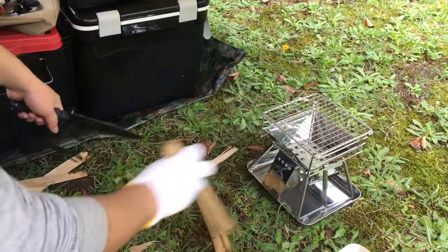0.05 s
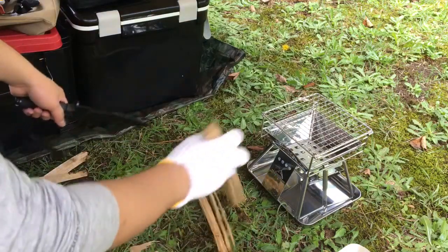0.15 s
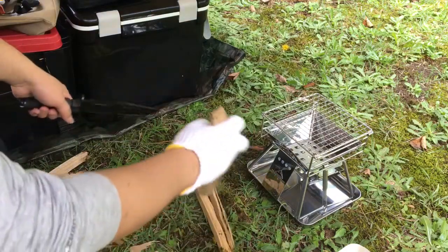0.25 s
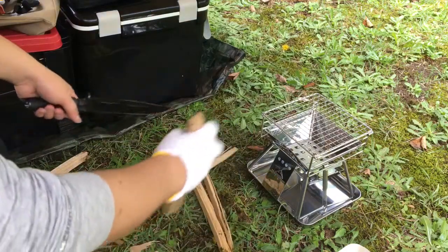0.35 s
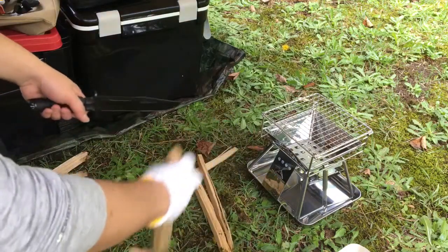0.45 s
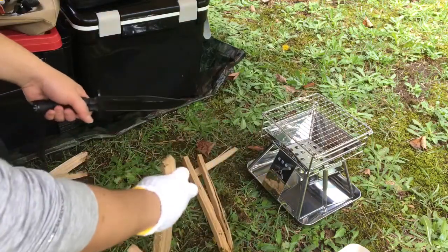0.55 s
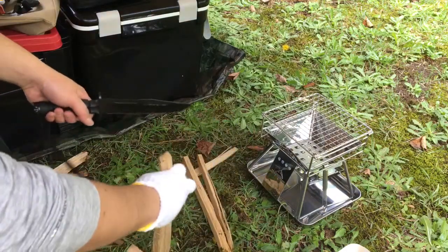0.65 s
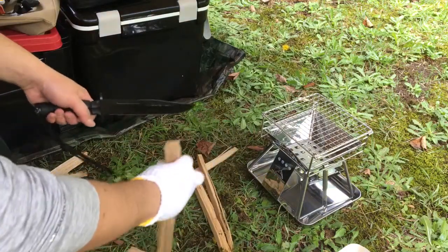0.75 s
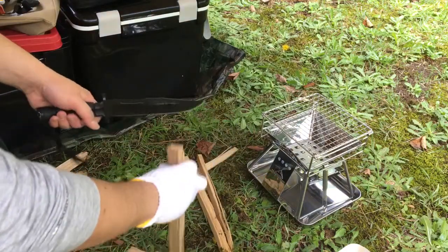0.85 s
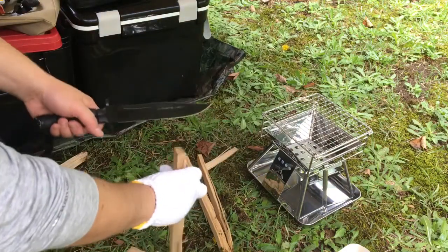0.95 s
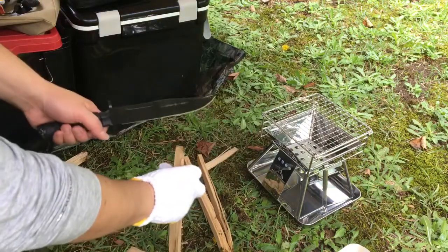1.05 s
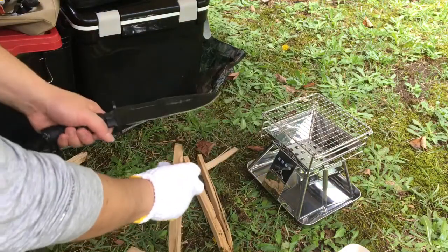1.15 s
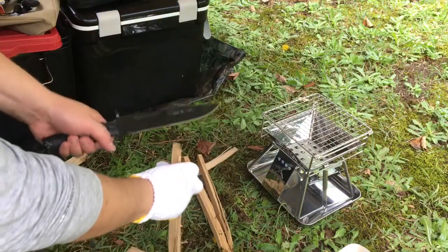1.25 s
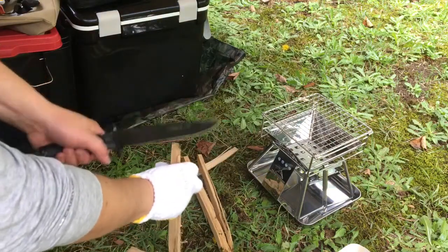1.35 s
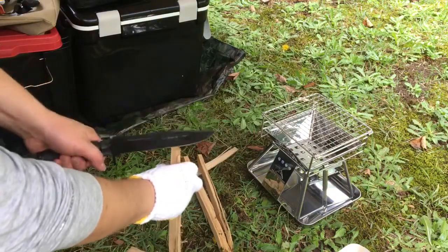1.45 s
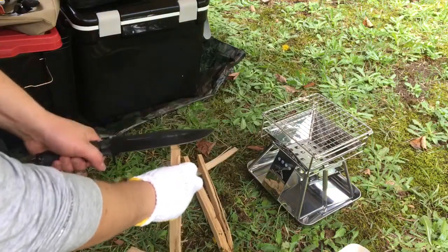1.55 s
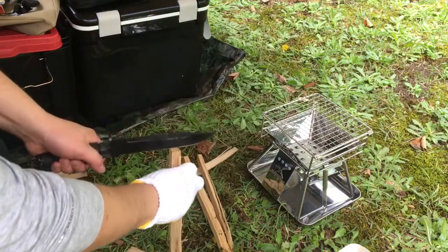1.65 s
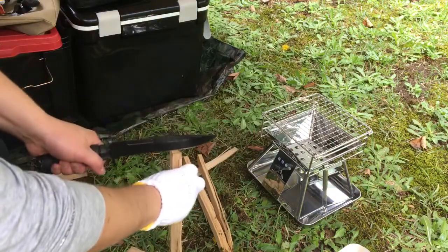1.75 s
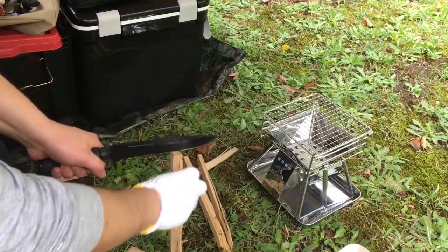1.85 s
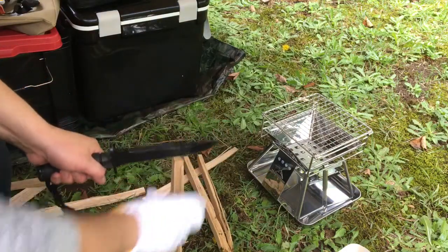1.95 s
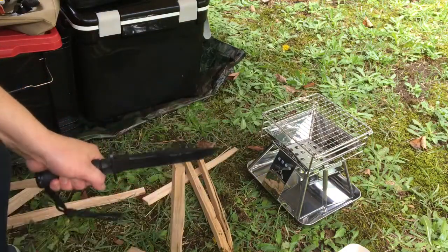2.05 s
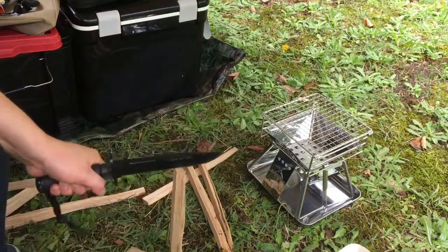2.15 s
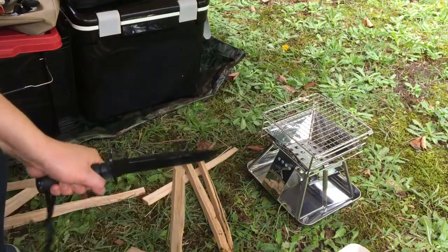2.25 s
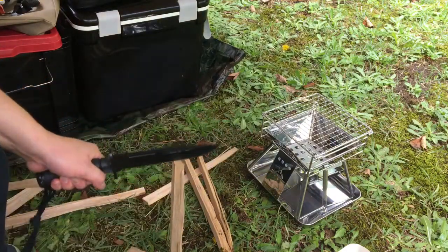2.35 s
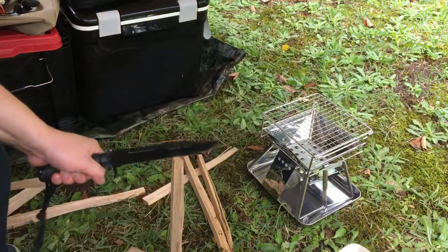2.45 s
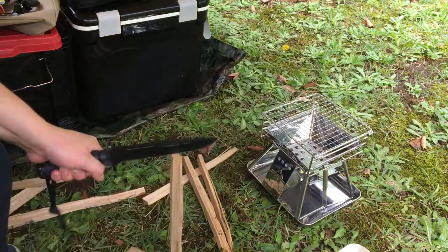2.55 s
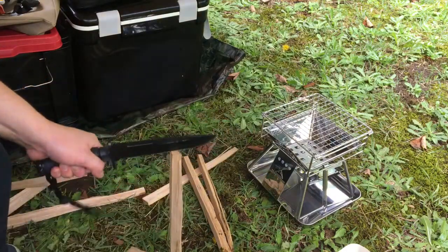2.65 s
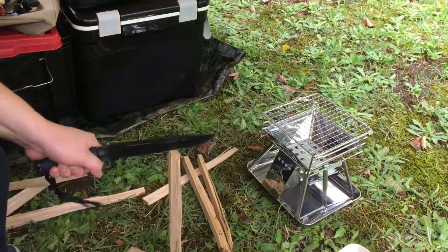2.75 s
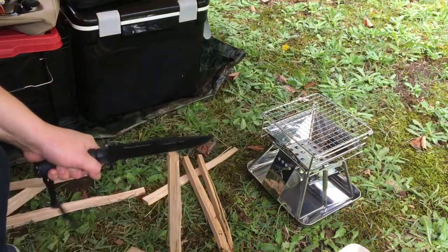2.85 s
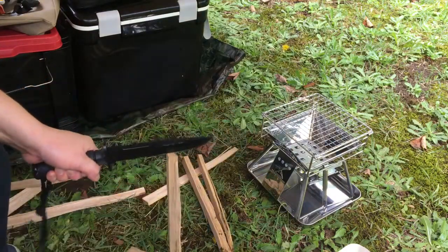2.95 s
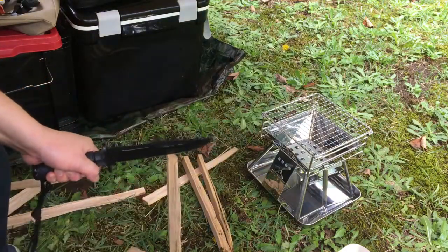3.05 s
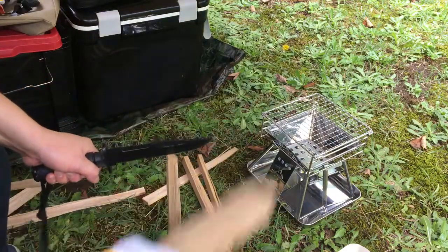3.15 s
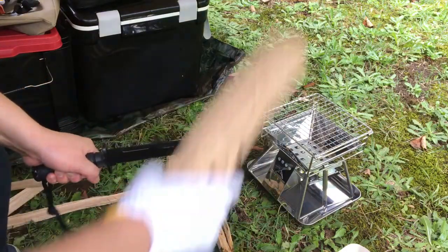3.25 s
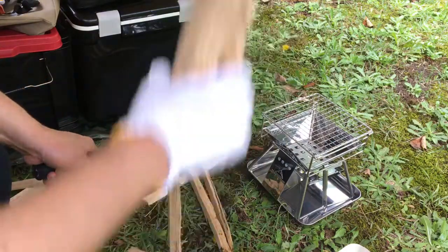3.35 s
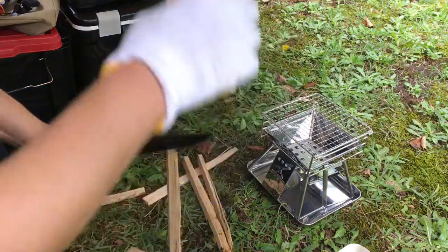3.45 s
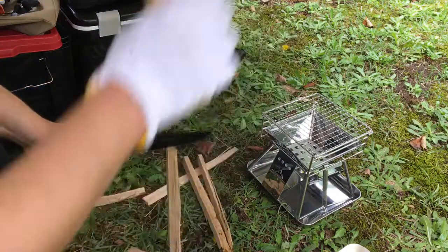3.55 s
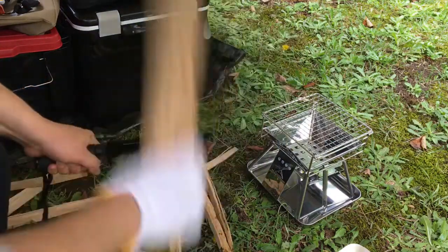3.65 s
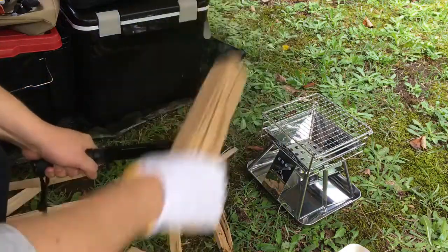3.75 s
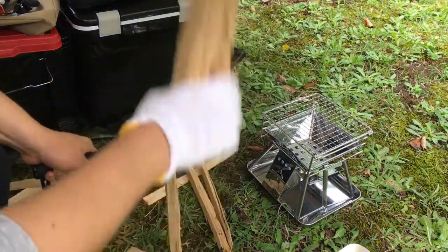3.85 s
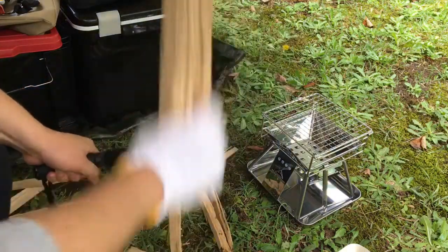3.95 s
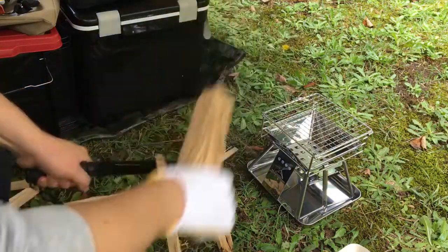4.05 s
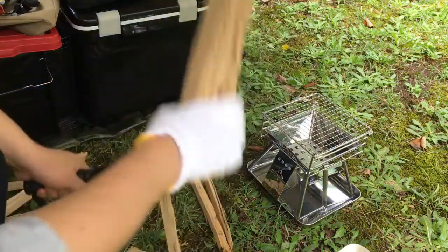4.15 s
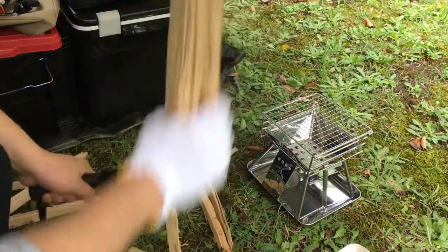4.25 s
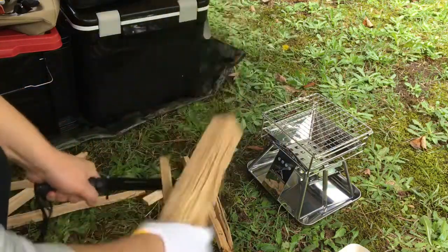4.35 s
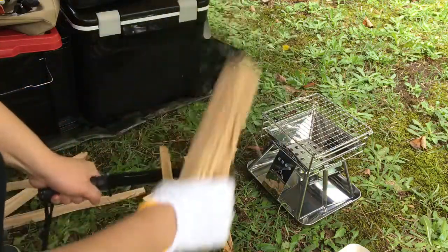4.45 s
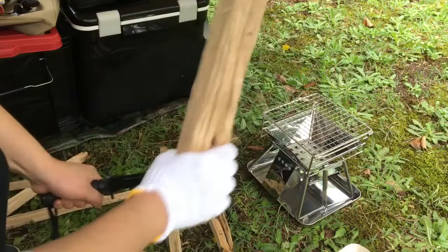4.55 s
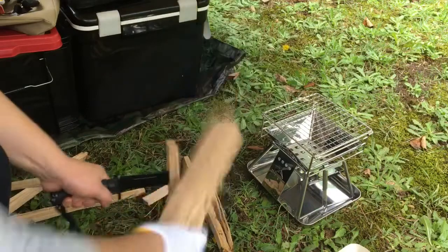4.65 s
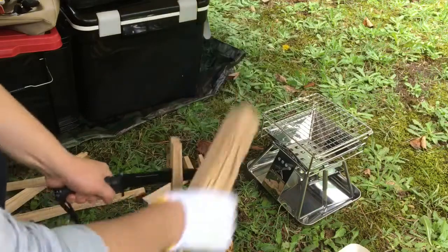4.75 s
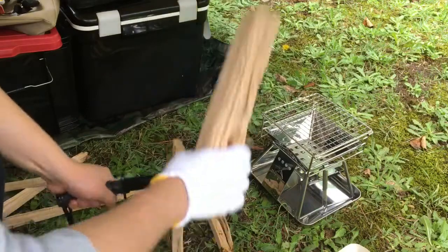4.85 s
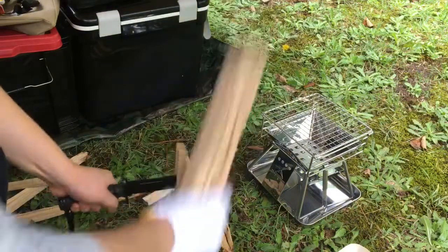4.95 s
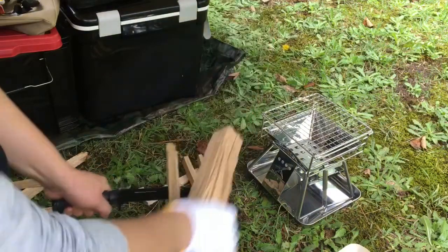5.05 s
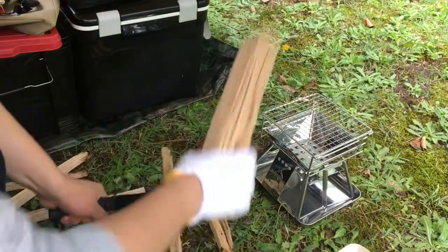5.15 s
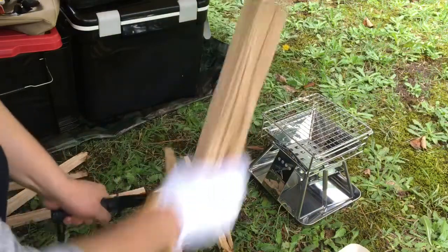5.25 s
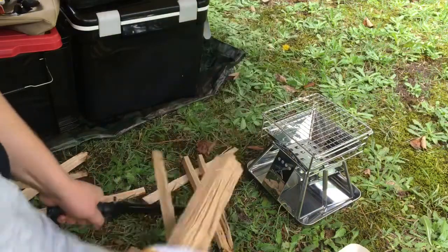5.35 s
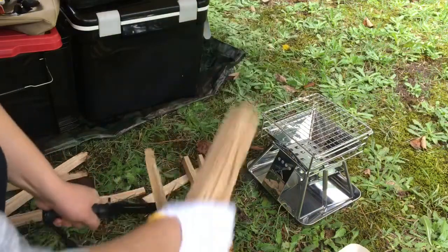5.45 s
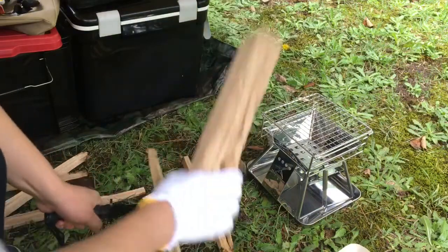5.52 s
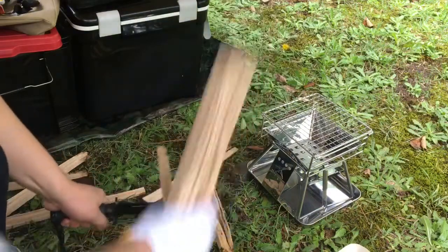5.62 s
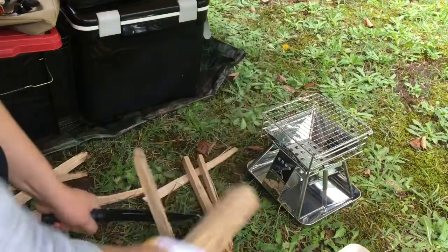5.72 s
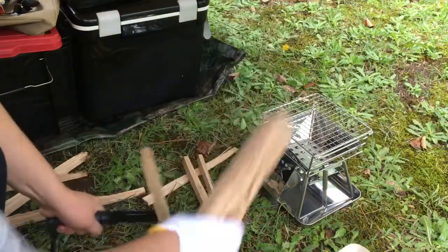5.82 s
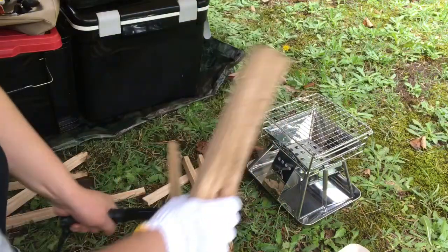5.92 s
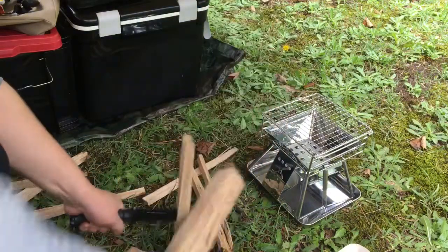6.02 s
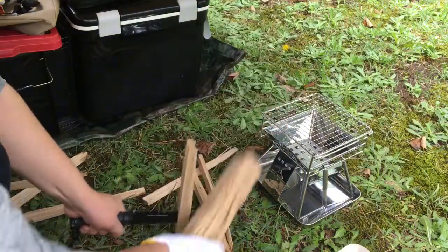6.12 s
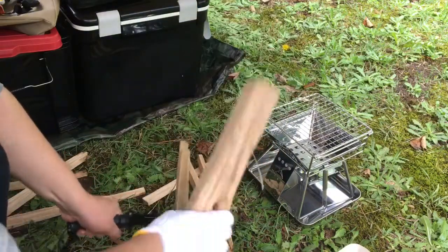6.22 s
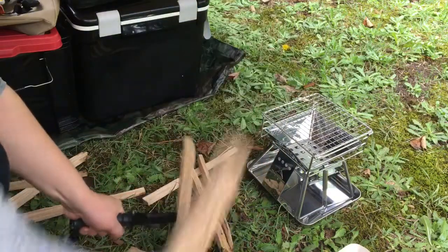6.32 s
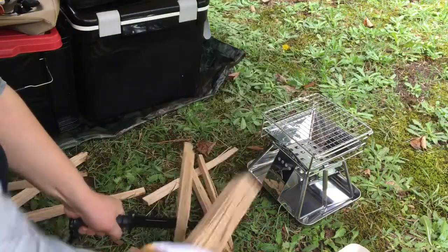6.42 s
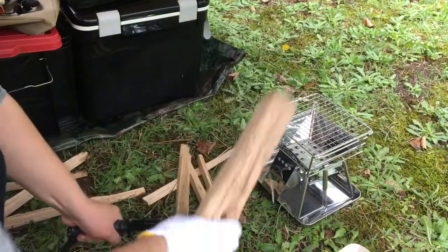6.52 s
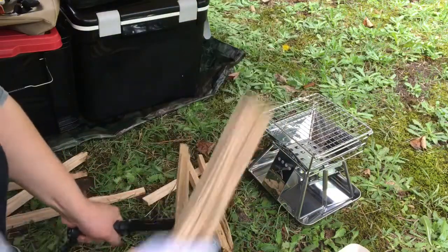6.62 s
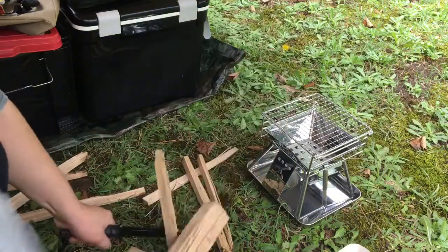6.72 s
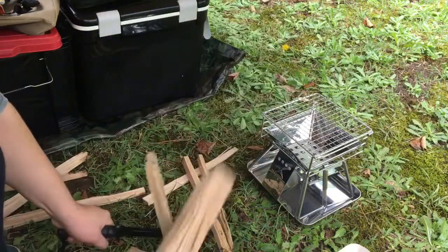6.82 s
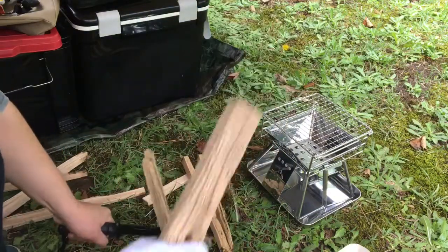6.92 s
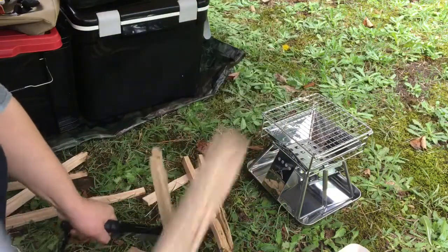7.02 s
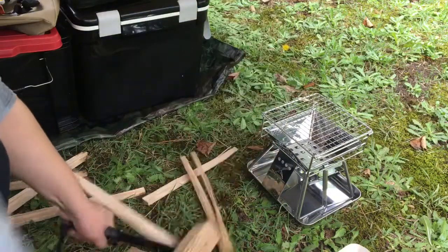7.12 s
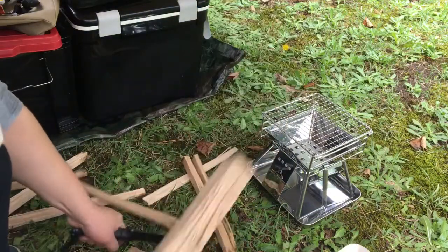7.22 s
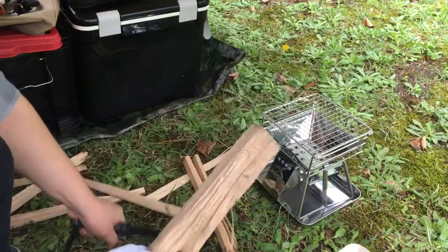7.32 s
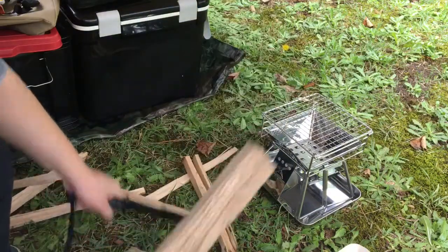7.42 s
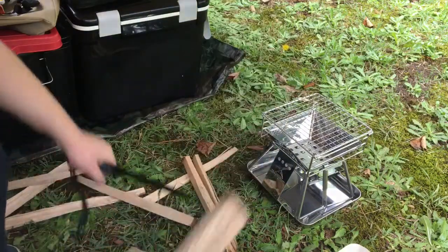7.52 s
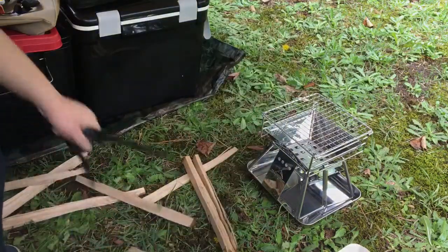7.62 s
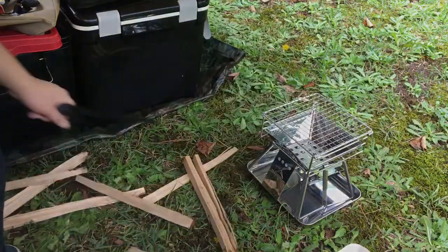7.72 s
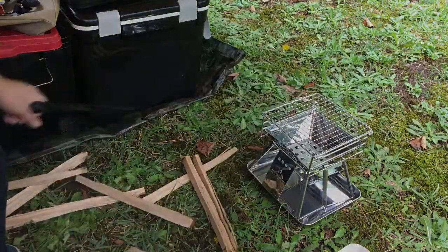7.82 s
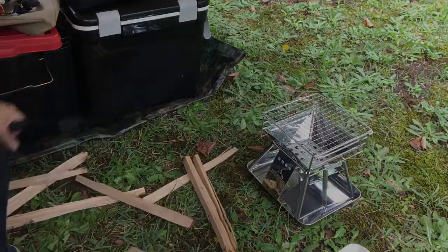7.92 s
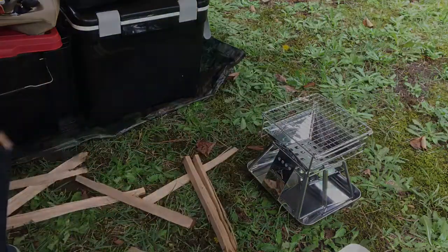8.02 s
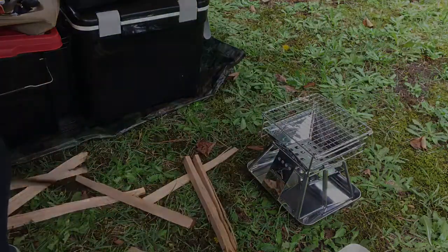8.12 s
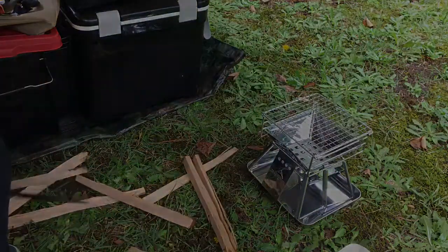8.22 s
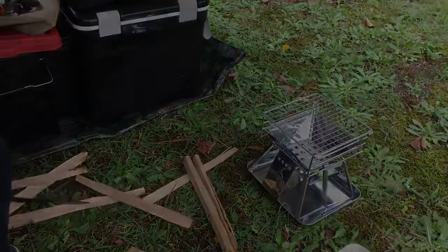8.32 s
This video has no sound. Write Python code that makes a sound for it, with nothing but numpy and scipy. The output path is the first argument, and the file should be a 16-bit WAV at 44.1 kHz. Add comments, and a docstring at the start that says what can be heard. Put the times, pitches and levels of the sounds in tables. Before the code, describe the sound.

Outdoors on grass, a faint steady rush and tiny rustles lie under a few small wood ticks. After nearly four seconds, a log starts striking a knife wedged in a stick: sharp, dry woody cracks about three per second, with splintering crackle and soft earthy thuds. The last blow splits the wood, pieces clatter briefly, and quiet returns. Close single microphone, no obvious echo.

```python
"""Sharp woody blows with tearing cracks and soft thuds: a log drives a knife on the end of a stick on campsite grass.
Each blow excites short modes of stick, log and soil; filtered lumpy noise makes the tearing fibres, crackle and fizz.
Snaps are short noise bursts, knocks are noise taps ringing wood modes, and grass ticks are random high bursts.
Behind them lie wavering sine calls and a far steady rush of shaped noise.
The recorder turns its gain down after loud sound, rounds the peaks and cuts the top."""
import sys
import numpy as np
from scipy import signal
from scipy.fft import rfft, irfft
from scipy.io import wavfile
from scipy.ndimage import uniform_filter1d, minimum_filter1d

SR = 44100
rng = np.random.default_rng(int(sys.argv[2]) if len(sys.argv) > 2 else 0)


def output_pcm(signal):
    """Save a mono or channel-first signal as 16-bit PCM at the path in sys.argv[1].

    Samples are clipped to [-1, 1] before scaling.
    """
    pcm = np.clip(np.atleast_2d(signal).T, -1, 1) * 32767
    wavfile.write(sys.argv[1], SR, np.round(pcm).astype(np.int16))


N = 369558  # length in samples
SPAN = SR // 2  # longest single sound in samples

# Log on knife, some blows led by a glancing touch. Each row: start in seconds, stick level in dB,
# stick pitch in Hz, then thud, rumble, log, crackle and fizz levels in dB relative to the stick,
# and the crackle's 60 dB decay in seconds.
BLOWS = [(3.7501, -7, 1774, -6.5, -21, -0.5, -7, -16, .1),
         (4.07, -5.5, 1635, -9.5, -26, -10, -6, -22, 0.091),
         (4.399, -10, 1555, -11, -27, 3, 1, -20.5, 0.082),
         (4.71, -26.5, 1370, -2.5, -32, 10.5, -1, -11, 0.078),
         (4.7183, -8.5, 1203, -10, -28, -0.5, 3, -27, 0.061),
         (5.050, -11.5, 1454, -8, -24, 5.5, 4, -27, 0.059),
         (5.388, -11.5, 1363, -8, -23, 0.5, 5, -33, 0.067),
         (5.725, -30, 1316, -1.5, -33, -3, 3, -22, 0.089),
         (5.733, -8.5, 1480, -15.5, -26.5, 2, -1, -35, 0.07),
         (6.0613, -38, 1520, -3, -30, 0, 12.5, -17, .048),
         (6.088, -12.5, 1270, -9.5, -25, 0.5, 1.5, -24, 0.06),
         (6.408, -9.5, 1227, -12, -21.5, -1, -1.5, -9.5, 0.066),
         (6.736, -27.5, 900, 0.5, -32, 6.5, 1, -12, .043),
         (6.7449, -7, 1250, -15, -28, -3.5, -2, -13, 0.062),
         (7.1253, -13.5, 1186, -7, -15.5, 8.5, 1.5, -12, 0.078)]
# Further splits and snaps of fibres. Each row: start in seconds, level in dB, centre in Hz, 60 dB decay in seconds.
SNAPS = [(0.113, -44.5, 5960, .03), (0.182, -42, 7000, .02), (0.2141, -23.5, 6300, 0.044),
         (0.269, -30.5, 5950, .016), (3.05, -42.5, 8750, 0.1), (3.692, -43, 12000, .015),
         (3.820, -43, 11500, .01), (4.074, -13, 7760, .031), (4.0768, -8.5, 7560, 0.014),
         (4.172, -40, 4020, 0.024), (4.7224, -20, 7300, 0.016), (5.062, -7, 7000, 0.0098),
         (5.127, -36, 6920, 0.03), (5.1476, -37, 6910, .017), (6.069, -32, 6400, 0.048),
         (6.085, -27, 6500, .067), (6.392, -28, 6000, 0.047), (6.4, -29, 6500, 0.046),
         (6.4096, -8.5, 6300, 0.011), (6.997, -40.5, 8400, 0.01), (7.104, -41, 3500, 0.034),
         (7.131, -12.5, 7500, 0.084), (7.147, -26, 9000, .027), (7.156, -24, 9500, 0.024),
         (7.194, -40, 3200, 0.14), (7.21, -36.5, 5650, 0.2), (7.2875, -38, 6150, 0.044),
         (7.30, -42, 7800, .086), (7.7642, -35, 6860, 0.012), (7.772, -42, 8000, .012),
         (7.819, -40, 9800, 0.0088), (7.86, -34.5, 10400, .013), (7.897, -39.5, 7350, 0.012),
         (8.08, -37, 6300, .015)]
# Loose pieces of wood knocking. Each row: start in seconds, level in dB, pitch in Hz, 60 dB decay in seconds.
KNOCKS = [(0.032, -43.5, 1980, 0.037), (0.099, -45, 1985, 0.078), (0.215, -37.5, 2970, 0.014),
          (0.271, -42.5, 1900, 0.014), (0.27, -44, 3150, 0.028), (0.547, -38.5, 121, 0.075),
          (0.584, -42, 123, .053), (1.520, -42.5, 870, 0.01), (3.776, -32, 71, 0.22),
          (4.125, -37, 210, 0.14), (4.171, -33, 1270, 0.0047), (6.075, -33, 2000, 0.023),
          (6.127, -33, 540, 0.013), (6.4452, -32, 516, 0.024), (7.128, -11.5, 2690, 0.022),
          (7.141, -10, 1230, 0.0049), (7.144, -19.5, 874, 0.046), (7.159, -40.5, 2400, 0.18),
          (7.194, -42, 2290, .036), (7.20, -40.5, 3540, 0.13), (7.2252, -27, 432, 0.0215),
          (7.23, -38, 2070, 0.039), (7.236, -41, 950, .065), (7.289, -38.5, 3126, .07),
          (7.288, -36.5, 1650, 0.046), (7.296, -36.5, 2156, 0.056), (7.298, -36, 1120, .038),
          (7.775, -40, 152, 0.067), (8.088, -39, 1214, 0.038), (8.155, -40.5, 745, 0.019),
          (8.319, -47, 1000, .037)]
# Stick modes, damped by the wedged blade. Each row: ratio to the pitch, level in dB, 60 dB decay in seconds.
STICK_MODES = [(.62, -9, 0.0063), (0.781, -15, 0.069), (1.001, 3.5, 0.018), (1.2, -1, .02),
               (1.47, 0.5, 0.0068)]
# Log modes. Each row: frequency in Hz, level in dB, 60 dB decay in seconds.
LOG_MODES = [(2320, 11.5, 0.0017), (2645, -8, 0.0028), (3170, 1, 0.0092), (3680, -6, 0.0052),
             (4320, 0, 0.0039)]
# Butt of the stick on the soil. Each row: frequency in Hz at the middle stick pitch, level in dB,
# 60 dB decay in seconds.
THUD_MODES = [(254.4, -16, 0.086), (420.4, -4.5, 0.027), (541, -3, 0.0084)]
# The ground shaking on. Each row: frequency in Hz, level in dB, 60 dB decay in seconds.
RUMBLE_MODES = [(71, -32, 0.035), (117.3, 11.5, 0.062), (190, 4.5, 0.22)]
# Colour of the tearing fibres. Each row: ratio to the centre, width of each filter pass in Hz, level in dB.
CRACKLE_BANDS = [(0.804, 1850, 7.5), (0.998, 2570, 12.5), (1.249, 2600, 2)]
# Hands moving over grass and cloth. Each row: start in seconds, end in seconds, ticks per second,
# least tick level in dB before filtering.
HANDLING = [(2.5, 3.72, 14, -49.5), (7.72, 8.0, 38, -43)]
# Faint high calls, perhaps an insect or small bird. Each row: start in seconds, length in seconds,
# pitch at both ends in Hz, rise of the pitch arch in Hz, level in dB.
CALLS = [(2.44, .19, 10900, 150, -76), (2.635, 0.19, 11000, 350, -69), (3.15, 0.37, 11600, 300, -68),
         (8.17, .21, 11000, 2650, -68)]
# Spectrum of the far rush. Each row: frequency in Hz, relative density in dB per Hz.
RUSH_SPECTRUM = [(15, -59), (25, -25.5), (48, 1.5), (85, -7), (150, -5.5), (358, -11), (410, -14.5),
                 (687, -16), (809, -17.5), (1120, -13), (2820, -20.5), (8140, -21), (10700, -27.5),
                 (15200, -47.5), (16500, -82.5)]
# Dips of the microphone. Each row: centre in Hz, width in Hz, gain in dB.
MIC_DIPS = [(4876, 600, -6.5), (10380, 1600, -6.5)]

MIDDLE_PITCH_HZ = 1310  # stick pitch at which thud and crackle keep their listed tuning
THUD_SLOPE = -0.75  # power of the stick pitch: the thud rises as the stick pitch falls
CRACKLE_HZ, CRACKLE_SLOPE = 6770, 0.3  # centre, rising as a power of the stick pitch
FIZZ_HZ, FIZZ_WIDTH_HZ = 11880, 1000  # width of each filter pass
CONTACT_T60_S = 0.097  # rattle of the contact
# a tick after each blow, its level relative to the stick
REBOUND_S, REBOUND_DB, REBOUND_HZ, REBOUND_T60_S = 0.061, -31, 9200, 0.012
RUSH_DB = -48  # overall level
TOP_HZ = 15900  # the recorder cuts everything above


def undb(db):
    """Turn decibels into an amplitude factor."""
    return 10 ** (np.asarray(db) / 20)


def peak(x, db):
    """Scale a sound to a level over its loudest 3 ms."""
    return x * undb(db) / np.sqrt(uniform_filter1d(x ** 2, size=132).max())


def fade(t60):
    """Exponential decay of 60 dB in t60 seconds, never quicker than 3 ms."""
    return np.exp(-np.log(1000) * np.arange(SPAN) / SR / max(t60, 0.003))


def ring(x, hz, t60):
    """One decaying mode; small bodies radiate little below their pitch."""
    pole = np.exp(2j * np.pi * hz / SR - np.log(1000) / (t60 * SR))
    ringing = signal.lfilter([1], [1, -pole], x).imag
    b, a = signal.butter(2, hz / 2, "high", fs=SR)
    return signal.lfilter(b, a, ringing)


def modes(x, table, scale=1):
    """A struck body: the sum of its modes, their frequencies multiplied by scale."""
    return sum(undb(db) * ring(x, scale * f, t60) for f, db, t60 in table)


def band(x, hz, width):
    """Resonance with a gain of 1 at its centre."""
    b, a = signal.iirpeak(min(hz, 0.4 * SR), max(hz / width, 0.3), SR)
    return signal.lfilter(b, a, x)


def band_twice(x, hz, width):
    """The same resonance passed twice for steeper sides."""
    return band(band(x, hz, width), hz, width)


def cracks(chance, t60, lumps_db):
    """Dense breaking fibres: noise in uneven lumps under a dying envelope."""
    # each random level lasts 50 samples; reversing separates the lumps from the noise they shape
    lumps = np.repeat(chance[::50], 50)[:SPAN][::-1]
    return chance * undb(lumps_db * lumps) * fade(t60)


def add(out, s, sound):
    """Mix a sound in at s seconds."""
    i = int(s * SR)
    out[i:i + len(sound)] += sound[:N - i]


def blow(chance, db, hz, thud_db, rumble_db, log_db, crackle_db, fizz_db, t60):
    """A sharp strike, then contact that rattles on as the blade bites, drive the short modes."""
    pitch = hz / MIDDLE_PITCH_HZ
    strike = np.sign(chance[0, 0]) * fade(0.003)
    push = strike + undb(-16) * cracks(chance[0], CONTACT_T60_S, 2.5)
    stick = modes(push, STICK_MODES, hz)
    soil_push = strike + undb(-5.0) * chance[2] * fade(0.082)
    thud = modes(soil_push, THUD_MODES, pitch ** THUD_SLOPE)
    # the log bounces off, so it is driven more briefly
    log = modes(push * fade(0.24), LOG_MODES)
    # the lows build up late and stay
    shake = chance[2][::-1] * fade(0.16) * (1 - fade(0.018))
    rumble = modes(shake, RUMBLE_MODES)
    # a first snap and the main burst, then fibres go on tearing faintly
    tear = cracks(chance[1], t60, 2.5) + undb(-28) * cracks(chance[1], 0.3, 3.5)
    tear = tear * (1 + 0.27 * fade(0.0055))
    centre = CRACKLE_HZ * pitch ** CRACKLE_SLOPE
    crackle = sum(undb(gain) * band_twice(tear, ratio * centre, width)
                  for ratio, width, gain in CRACKLE_BANDS)
    fizz = band_twice(tear, FIZZ_HZ, FIZZ_WIDTH_HZ)
    parts = (stick, thud, rumble, log, crackle, fizz)
    gains_db = (0, thud_db, rumble_db, log_db, crackle_db, fizz_db)
    return sum(peak(part, db + gain) for part, gain in zip(parts, gains_db))


def blows():
    """Every blow of the log, and the tick as it comes off."""
    out = np.zeros(N)
    chances = rng.standard_normal((len(BLOWS), 4, SPAN))
    for (s, db, *rest), chance in zip(BLOWS, chances):
        add(out, s, blow(chance, db, *rest))
        tick = snap(chance[3], db + REBOUND_DB, REBOUND_HZ, REBOUND_T60_S)
        add(out, s + REBOUND_S, tick)
    return out


def snap(chance, db, hz, t60):
    """A short burst of cracking noise around a centre, each filter pass as wide as its frequency."""
    return peak(band_twice(cracks(chance, t60, 0.5), hz, hz), db)


def snaps():
    """Fibres splitting further, each a snap of its own."""
    out = np.zeros(N)
    for (s, db, hz, t60), chance in zip(SNAPS, rng.standard_normal((len(SNAPS), SPAN))):
        add(out, s, snap(chance, db, hz, t60))
    return out


def knocks():
    """Pieces of wood ring briefly with the mode ratios of the stick, the main one foremost."""
    out = np.zeros(N)
    contrast = 2.5  # stretches the dB differences between modes
    for (s, db, hz, t60), chance in zip(KNOCKS, rng.standard_normal((len(KNOCKS), SPAN))):
        tap = chance * fade(t60 / 2)
        wood = sum(undb(contrast * gain) * ring(tap, hz * ratio, t60) for ratio, gain, _ in STICK_MODES)
        add(out, s, peak(wood, db))
    return out


def grass(per_s=20, db=-66, spread_db=4):
    """Faint high ticks of blades of grass and cloth, at random, louder while the hands move."""
    chance, t = rng.random((3, N)), np.arange(N) / SR
    ticks = (chance[0] < per_s / SR) * undb(db)
    for start, end, rate, hand_db in HANDLING:
        moving = (t > start) * (t < end)
        ticks = ticks + moving * (chance[2] < rate / SR) * undb(hand_db)
    # a random boost: most ticks stay faint, a few stand out
    ticks = ticks * undb(-spread_db * np.log(chance[1] + 1e-9))
    envelope = signal.fftconvolve(ticks, fade(0.022)[:2000])[:N]
    burst = envelope * rng.standard_normal(N)
    return band_twice(burst, 11000, 5000)


def call(edge=0.4):
    """Wavering sines; each call swells and fades while its pitch arches up and back."""
    t, out = np.arange(N) / SR, 0
    waver = 1 + 0.1 * uniform_filter1d(rng.standard_normal(N), size=100)
    for start, length, hz, arch_hz, db in CALLS:
        arch = np.sin(np.pi * np.clip((t - start) / length, 0, 1)).clip(0) * (t < start + length)
        phase = 2 * np.pi * np.cumsum((hz + arch_hz * arch) * waver) / SR
        # an edge below 1 makes the swell and fade steeper
        out = out + undb(db) * arch ** edge * np.sin(phase)
    return out


def rush():
    """Far water or leaves: smooth shaped noise, the bass a little gusty."""
    hz, db = np.transpose(RUSH_SPECTRUM)
    f = np.fft.rfftfreq(N, 1 / SR) + 1  # the 1 avoids the log of zero
    colour = undb(np.interp(np.log(f), np.log(hz), db))
    x = irfft(rfft(rng.standard_normal(N)) * colour, N)
    gust = uniform_filter1d(np.repeat(rng.standard_normal(N // 4000 + 1), 4000)[:N], size=4000)
    bass = signal.sosfiltfilt(signal.butter(2, 250, fs=SR, output="sos"), x)
    x = x + bass * (undb(0.4 * gust) - 1)
    return x * undb(RUSH_DB) / np.std(x)


def scene():
    """Mix all layers, from the blows to the far rush, into one channel."""
    return (blows() + snaps() + knocks() + grass() + call() + rush())[None]


def record(dry, top_db=-24, duck_db=-3.0, hold_s=0.12, slew_s=0.14):
    """Microphone with little deep bass and two dips; gain drops after loud sound and holds; peaks round, top cut."""
    x = signal.sosfilt(signal.butter(3, 40, "high", fs=SR, output="sos"), dry[0])
    for hz, width, db in MIC_DIPS:
        x = x - (1 - undb(db)) * band(x, hz, width)
    loud = np.sqrt(np.abs(uniform_filter1d(x ** 2, size=400)))
    # the drop starts at top_db and deepens with loudness, down to duck_db
    want = duck_db * np.clip(np.log(loud / undb(top_db) + 1e-9), 0, 1)
    hold, slew = int(hold_s * SR), int(slew_s * SR)
    # both windows look back in time, so the gain follows the sound
    held = minimum_filter1d(want, hold, origin=(hold - 1) // 2)
    gain_db = uniform_filter1d(held, slew, origin=(slew - 1) // 2)
    x = 0.92 * np.tanh(1.1 * x * undb(gain_db))
    return signal.sosfilt(signal.ellip(9, 0.2, 90, TOP_HZ, fs=SR, output="sos"), x)[None]


dry = scene()
out = record(dry)
output_pcm(out)
```